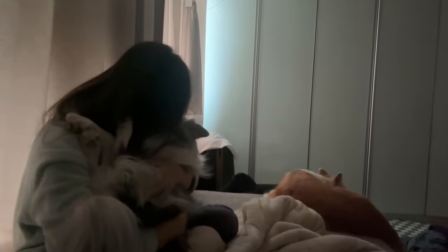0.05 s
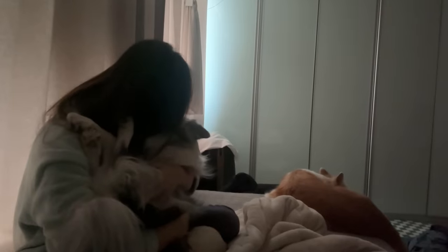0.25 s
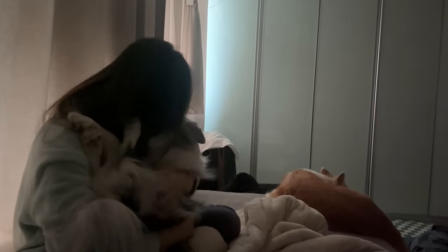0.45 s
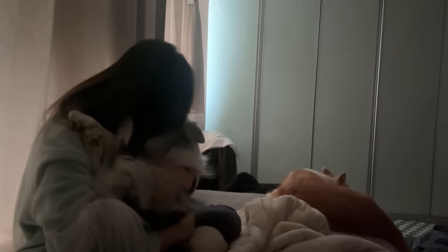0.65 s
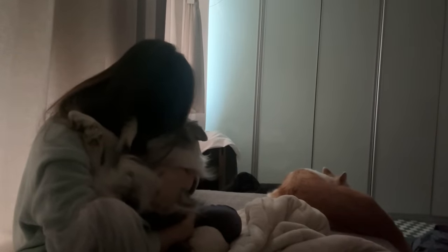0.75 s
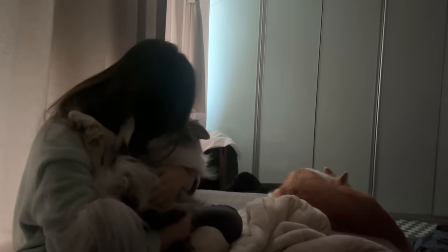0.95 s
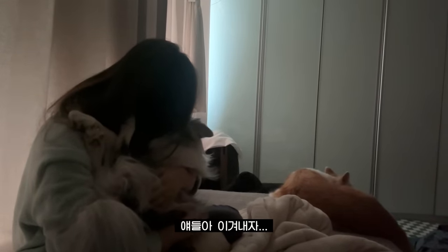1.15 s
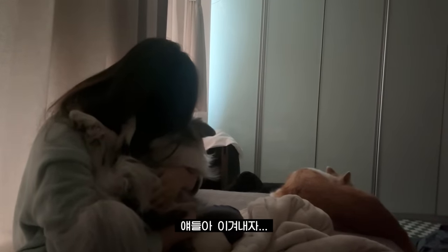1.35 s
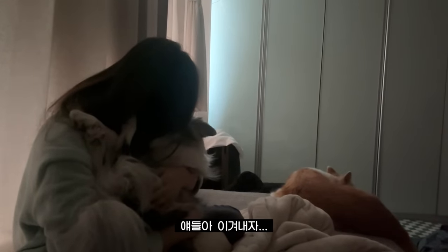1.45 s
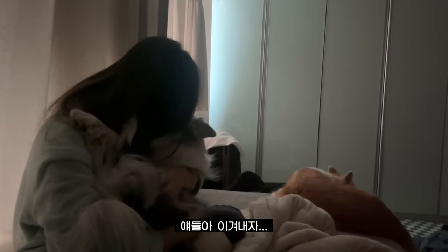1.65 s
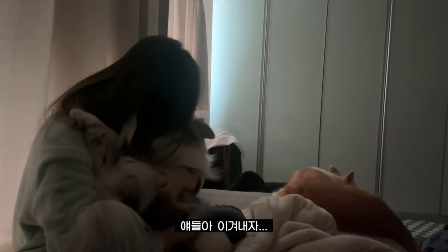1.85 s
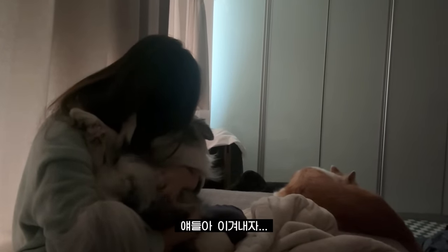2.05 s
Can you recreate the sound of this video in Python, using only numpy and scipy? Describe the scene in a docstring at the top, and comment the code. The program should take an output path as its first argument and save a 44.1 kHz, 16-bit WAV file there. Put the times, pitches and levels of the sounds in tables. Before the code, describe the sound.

Heavy footsteps from the floor above thud through the ceiling of a quiet bedroom. The dull, booming heel falls land at about 0.2, 0.7, 1.2, 1.6 and 2.1 seconds, slightly to the right, each with a short low ring. The third and fifth are more muffled. Bedding rustles very faintly near 0.5 and 1.5 seconds, and a soft building rumble and microphone hiss run throughout.

```python
"""A quiet bedroom, stereo microphone one floor below someone walking heavily.
Each heel bends the slab overhead, whose booming modes arrive later the lower they are; the ceiling
under it knocks first and dies sooner. The feet scuff lightly between heel falls.
In the room, bedding rustles faintly and a hollow hum comes and goes, over the building's low rumble
and the microphone's hiss."""
import sys
import numpy as np
from scipy.fft import rfft, irfft, next_fast_len
from scipy.io import wavfile
from scipy.ndimage import map_coordinates

SR = 44100
rng = np.random.default_rng(int(sys.argv[2]) if len(sys.argv) > 2 else 0)


def generate_wav(signal):
    """Clip the signal to [-1, 1] and save it as 16-bit WAV at the path in sys.argv[1]."""
    frames = np.transpose(np.atleast_2d(signal))
    scaled = np.clip(frames, -1, 1) * 32767
    pcm = np.round(scaled).astype(np.int16)
    wavfile.write(sys.argv[1], SR, pcm)


N = 92610

# Levels in the tables are relative; pan_db is left minus right.
# Heels upstairs: start_s, level_db, dullness_db_per_octave, knock_db, damped_after_s
HEEL_FALLS = [(-.34, -1.5, 3, -8, 0.45), (.2, -0.5, 0.5, -1.5, 0.93), (0.743, -1.27, 1, 0, 0.94),
              (1.138, -14, 8, -21.5, 0.061), (1.1777, -4.5, 5.5, -10.5, 0.27),
              (1.612, -2.64, 0.5, -1.5, .4), (2.088, 1.5, 5.5, -11.5, 0.62)]
# Modes of the floor slab and of the ceiling under it: pitch_hz, level_db, t60_s, pan_db
SLAB_MODES = [(47,-45.5,1.9,-2),(53.78,-33.5,1.07,-11),(58.02,-14.5,0.48,-3),(66.17,-9.5,0.38,-2.2),(70.38,-31,1.1,-0.5),(75.48,-18,0.19,-7),(78.91,-24,0.95,0),(84.3,-19.5,0.51,-3.5),(90.76,-27,0.91,-7),(102.35,-28.5,0.83,-2.5),(109.7,-22.5,0.28,-2),(126.56,-27,0.46,-11),(133.86,-17,0.35,-6.5)]
CEILING_MODES = [(144.85,-20.5,0.38,-3),(162,-31,0.41,-11.5),(175.5,-10,.15,-21),(185.55,-12.5,0.21,9.5),(209.7,-26,0.35,-6.5),(235.7,-6.5,0.087,-1),(253.2,-24,0.3,-13),(277.9,-18.5,0.14,-24),(287.6,-32,0.31,-6),(311.1,-25,0.24,3.5),(348.3,-18.5,0.14,-16.5),(364.6,-7.5,0.064,-14.5),(432.6,-27,0.13,5)]
# Spectrum of the dense upper modes: frequency_hz, level_db
KNOCK_SPECTRUM = [(100, -11), (200, 6), (380, 2.5), (470, 0.5), (600, -12), (750, -23), (1100, -31),
                  (2000, -62), (5000, -93)]
# Spectrum of the building's rumble: frequency_hz, level_db
RUMBLE_SPECTRUM = [(20, -26), (35, -19), (55, -10), (75, 2.5), (115, 1.5), (160, -7), (300, -15),
                   (450, -20.5), (700, -28), (1500, -59)]
# Microphone hiss, in phase and in opposite phase: frequency_hz, level_db
HISS_MID_SPECTRUM = [(470, -23.5), (800, -2), (884, -2.5), (1160, -4.5), (2670, -10.5), (3880, -12),
                     (4230, -9.5), (4670, -13), (5360, -10), (7130, -18), (7880, -22), (8590, -3),
                     (9260, -16), (10100, -15), (11700, -15.5), (14700, -13.5), (15600, -14.5)]
HISS_SIDE_SPECTRUM = [(470, -45.5), (800, 1.5), (1380, -9.5), (2220, -9.5), (4030, -14), (5630, -11.5),
                      (7220, -1.5), (7780, -7.5), (8480, 2), (8920, 0.5), (9260, -15), (10400, -19),
                      (11700, -55), (15600, -45.5)]
# Rise and fall of the hollow hum: time_s, level_db
HUM_SWELL = [(.4, -93), (.54, -74.5), (.63, -68), (.72, -72), (1.15, -79.5), (1.35, -93.5)]
# Balance of the background at the microphone: frequency_hz, pan_db
BACKGROUND_PAN = [(100, -3.5), (700, -1.5), (4400, -1.6), (8200, 1), (11000, 0.5)]
# Feet overhead, bedding in the room: peak_s, level_db, centre_hz, half_width_octaves, half_length_s
FOOT_SCUFFS = [(.15, -54.5, 103, 0.6, 0.013), (.6, -58, 168, 0.92, 0.028), (1.42, -60, 271, 1, 0.013),
               (1.85, -59, 229, 0.43, 0.012)]
BEDDING_RUSTLES = [(.47, -72, 3130, 0.31, 0.0067), (.49, -78.5, 3430, 0.28, 0.017),
                   (.555, -74, 8860, 0.19, 0.019), (1.478, -73.5, 1510, 1.2, 0.023)]

TIME_S = np.arange(N) / SR


def amp(db):
    """Decibels to gain."""
    return 10 ** (np.asarray(db) / 20)


def pan(pan_db):
    """Left and right gains, pan_db apart."""
    return amp(np.outer([0.5, -0.5], pan_db))


def stereo(mid, side):
    """Left and right from mid and side."""
    return np.array([mid + side, mid - side])


def curve_db(points, hz):
    """Level at hz along (frequency_hz, level_db) points."""
    points_hz, points_db = np.transpose(points)
    return np.interp(np.log(hz), np.log(points_hz), points_db)


def filtered(x, gain):
    """x times a gain that depends on frequency."""
    size = next_fast_len(N + 8192)
    hz = np.fft.rfftfreq(size, 1 / SR) + 1e-3
    return irfft(rfft(x, size) * gain(hz), size)[..., :N]


def noise(level_db):
    """Noise of rms 1 whose spectrum is level_db(hz)."""
    shaped = filtered(rng.standard_normal(N), lambda hz: amp(level_db(hz)))
    return shaped / shaped.std()


def coloured(spectrum):
    """Noise shaped by a spectrum table."""
    return noise(lambda hz: curve_db(spectrum, hz))


def stereo_band(centre_hz, octaves, side_db):
    """Stereo noise in a bell-shaped band, 10 dB down at `octaves` from its centre."""
    def bell_db(hz):
        return -10 * (np.log2(hz / centre_hz) / octaves) ** 2
    return stereo(noise(bell_db), amp(side_db) * noise(bell_db))


def wobble(knots_per_s):
    """A smooth random curve."""
    knots = rng.standard_normal(int(N * knots_per_s / SR) + 4)
    return map_coordinates(knots, [TIME_S * knots_per_s])


def heel_ringing(modes, rise_cycles):
    """Overhead, every heel swells the same modes, the low ones later, until the planted foot damps them."""
    boom_hz = 61  # a soft heel loses level above this
    out = np.zeros((2, N))
    for hz, mode_db, t60_s, pan_db in modes:
        lag_s = 0.01 * (100 / hz) ** 1.6
        for start_s, heel_db, dullness, _, damped_after_s in HEEL_FALLS:
            since_arrival_s = TIME_S - start_s - lag_s
            live = (since_arrival_s > 0) & (since_arrival_s < 1.5 * t60_s)
            age_s = since_arrival_s[live]
            rise = (1 - np.exp(-age_s * hz / rise_cycles)) ** 2
            decay = amp(-60 * age_s / t60_s)
            foot_damping = np.exp(-(age_s / damped_after_s) ** 4)
            gain = amp(mode_db + heel_db - dullness * np.log2(hz / boom_hz))
            tone = np.sin(2 * np.pi * hz * age_s)
            out[:, live] += pan(pan_db) * gain * rise * decay * foot_damping * tone
    return out


def building_rumble():
    """The building rumbles low and steady all around the microphone."""
    return amp(-57.5) * stereo(coloured(RUMBLE_SPECTRUM), amp(-3) * coloured(RUMBLE_SPECTRUM))


def microphone_hiss():
    """The microphone's own noise, its level wavering slightly."""
    mid = amp(-72.5) * coloured(HISS_MID_SPECTRUM)
    side = amp(-69) * coloured(HISS_SIDE_SPECTRUM)
    waver_db = 0.38 * wobble(knots_per_s=15)
    return amp(waver_db) * stereo(mid, side)


def brushing(contacts, side_db):
    """Feet scuffing upstairs or bedding stirring in the room: each rub is a short swell of noise."""
    out = np.zeros((2, N))
    for peak_s, level_db, centre_hz, octaves, half_length_s in contacts:
        swell = np.exp(-((TIME_S - peak_s) / half_length_s) ** 2)
        out += amp(level_db) * swell * stereo_band(centre_hz, octaves, side_db)
    return out


def heel_knocks():
    """Modes too dense to tell apart give each heel a short dull knock, overhead and to the right."""
    rise_s, t60_s = 0.025, 0.23
    lead_s = 0.012  # the fastest waves come ahead of the rest
    out = np.zeros((2, N))
    for start_s, _, _, knock_db, _ in HEEL_FALLS:
        age_s = np.maximum(TIME_S - start_s + lead_s, 0)
        rise = (1 - np.exp(-age_s / rise_s)) ** 2
        decay = amp(-60 * age_s / t60_s)
        dense_modes = stereo(coloured(KNOCK_SPECTRUM), amp(-0.5) * coloured(KNOCK_SPECTRUM))
        out += amp(knock_db) * rise * decay * dense_modes
    return amp(-31.5) * pan(-4.5) * out


def hollow_hum():
    """A faint, narrow band of noise swells and fades in the room."""
    level_db = np.interp(TIME_S, *np.transpose(HUM_SWELL))
    return amp(level_db) * stereo_band(centre_hz=589, octaves=0.17, side_db=0.5)


def scene():
    """The footsteps and the quiet bedroom, heard from one floor below the walker."""
    slab = amp(-0.5) * heel_ringing(SLAB_MODES, rise_cycles=3.16)
    ceiling = amp(2) * heel_ringing(CEILING_MODES, rise_cycles=13.36)
    knocks = heel_knocks()
    scuffs = brushing(FOOT_SCUFFS, side_db=-2)
    bedding = brushing(BEDDING_RUSTLES, side_db=-3)
    background = building_rumble() + hollow_hum() + microphone_hiss()
    background = filtered(background, lambda hz: pan(curve_db(BACKGROUND_PAN, hz)))
    return slab + ceiling + knocks + scuffs + bedding + background


def record(dry):
    """The recorder keeps nothing above its band limit."""
    return filtered(dry, lambda hz: hz < 15750)


dry = scene()
out = record(dry)
generate_wav(out)
```